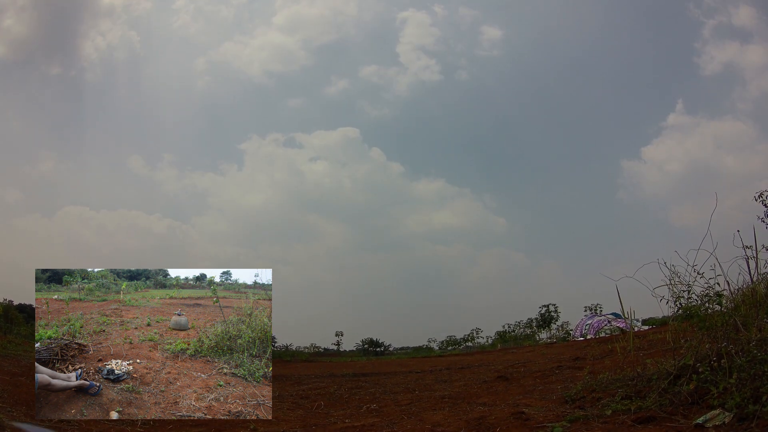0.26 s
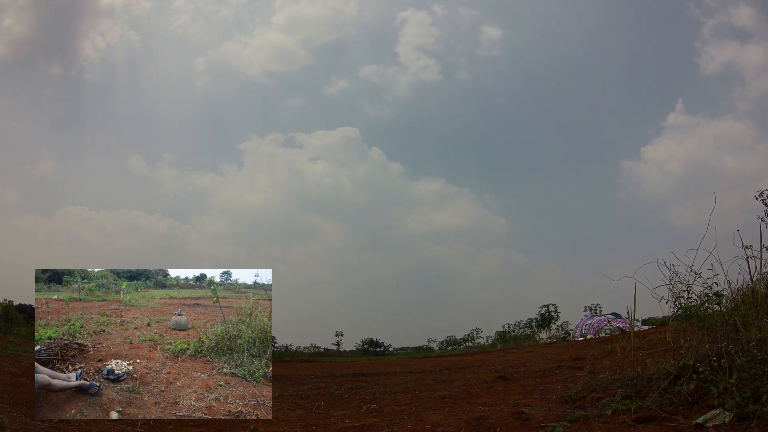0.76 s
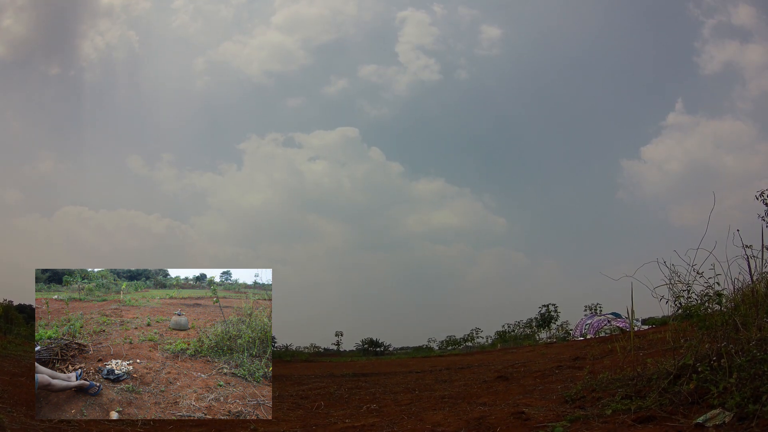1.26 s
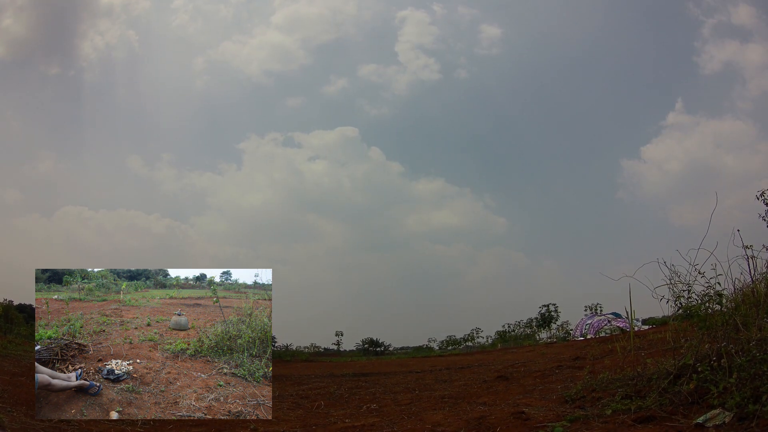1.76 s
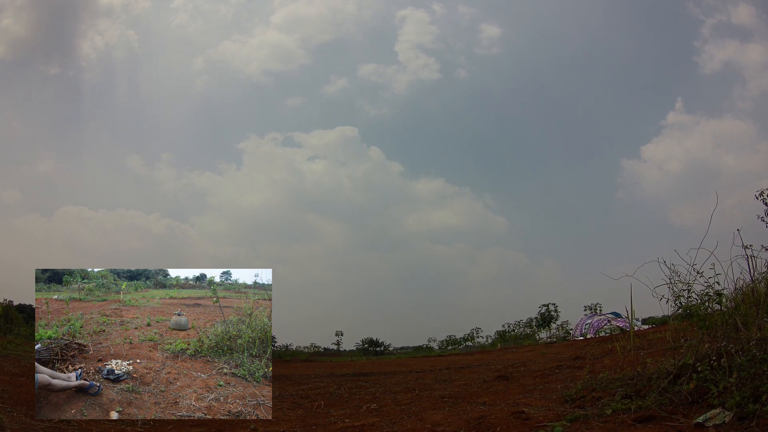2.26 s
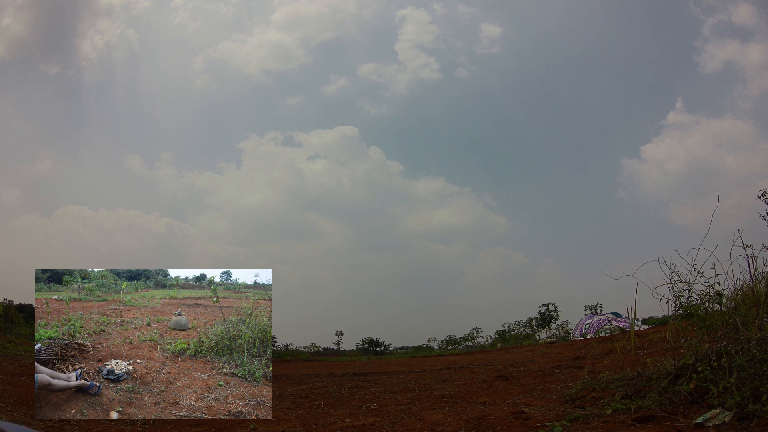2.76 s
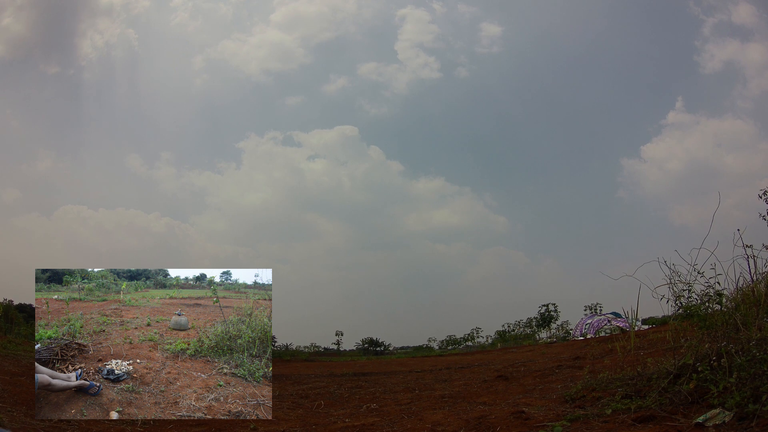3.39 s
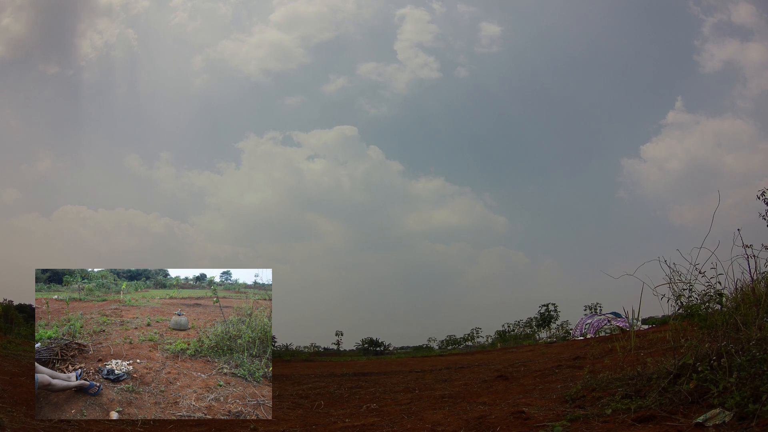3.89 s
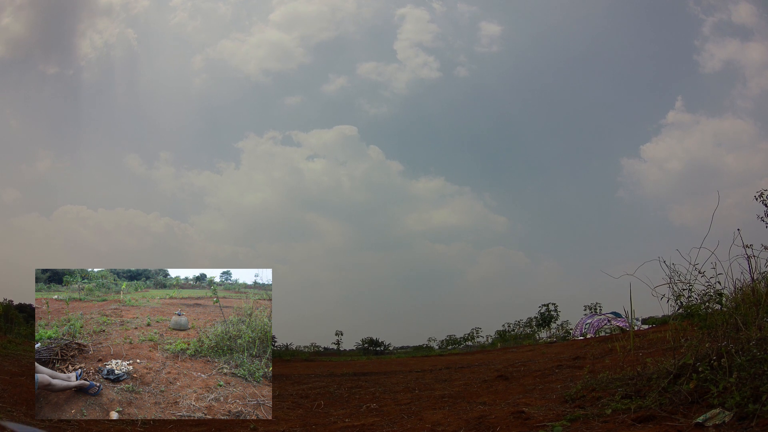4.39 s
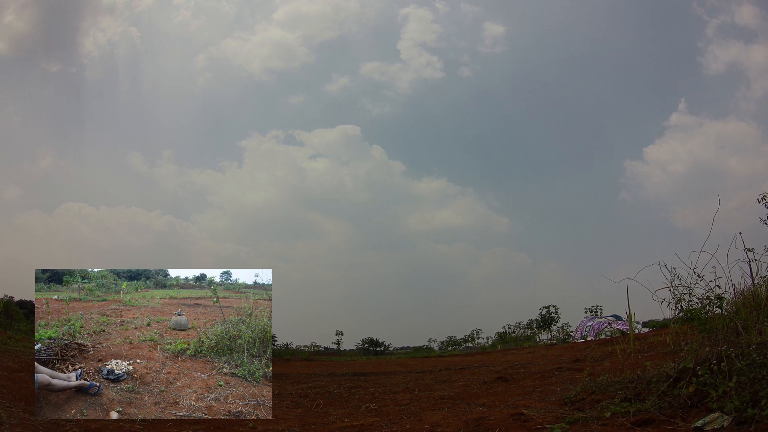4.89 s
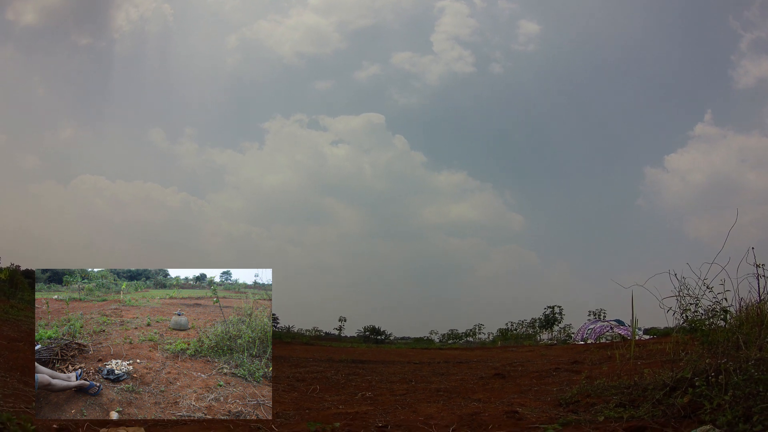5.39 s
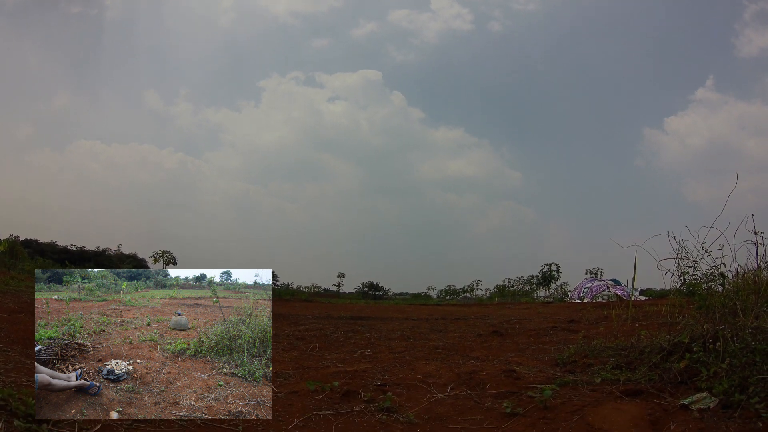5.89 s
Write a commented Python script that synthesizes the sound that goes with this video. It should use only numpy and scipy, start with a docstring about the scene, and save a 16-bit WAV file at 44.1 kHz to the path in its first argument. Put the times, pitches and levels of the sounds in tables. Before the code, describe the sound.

Heard from a small drone's own frame on bare open ground: four rotors idle with a dry mid-pitched rattle, bearing hiss and thin high squeal. Near the end the motors chirp and surge, the frame skids and rattles harder, air blasts off the soil, and the drone lifts into loud, beating blade tones that overload the close microphone.

```python
"""Four three-bladed rotors of a small drone, heard from its own frame: idle on bare ground, spool-up, lift-off.
Blade tones glide and beat as summed sinusoids of the integrated shaft angles; motors add high shaft orders.
Unbalance shakes the frame into a filtered-noise rattle with short tonal swells; in flight, loud beats of the
blade tones overload the microphone, which adds a third harmonic and grit.
Behind: blade-chopped noise for the downwash, low buffeting for the wind, microphone crackle and thin ticks."""
import sys
import numpy as np
from scipy import signal
from scipy.fft import rfft, irfft, next_fast_len
from scipy.io import wavfile
from scipy.ndimage import uniform_filter1d, minimum_filter1d, map_coordinates

SR = 44100
rng = np.random.default_rng(int(sys.argv[2]) if len(sys.argv) > 2 else 0)


def persist_wave(psi):
    """Save psi, clipped to +-1, as 16-bit WAV."""
    counts = np.round(np.clip(psi, -1, 1) * 32767).astype(np.int16)
    wavfile.write(sys.argv[1], SR, np.atleast_2d(counts).T)


N = 271185
TIME = np.arange(N) / SR  # s
BLADES = 3  # per rotor
RMS_TO_PEAK = np.sqrt(2)  # of a sine
THROTTLE_S, THROTTLE_RISE_S = 4.83, 0.032
LIFT_S, LIFT_HZ = 5.41, 425  # lift-off time, reference blade passing rate
CLIMB_M_PER_S = 1.0


def amp(db):
    """Decibels to gain."""
    return 10 ** (np.asarray(db) / 20)


def unit(x):
    """Scales to an rms of 1."""
    return x / np.sqrt(np.mean(x ** 2) + 1e-20)


def gain_at(spectrum, hz):
    """Spectrum gain at the given frequencies, interpolated over log frequency."""
    f_hz, db = np.transpose(spectrum)
    return amp(np.interp(np.log(hz + 1), np.log(f_hz + 1), db))


def coloured(x, spectrum):
    """Filters x by a spectrum, rms 1."""
    size = next_fast_len(N + SR // 4)  # padded against wrap-around
    f_hz = np.fft.rfftfreq(size, 1 / SR)
    filtered = irfft(rfft(x, size) * gain_at(spectrum, f_hz), size)
    return unit(filtered[:N])


def wander(rate_hz):
    """Smooth random signal, rms 1, changing about rate_hz times a second."""
    coarse_s = TIME[::64]
    points = rng.standard_normal(4096)
    smooth = map_coordinates(points, [coarse_s * 2 * rate_hz], order=2, mode="wrap")
    return unit(np.interp(TIME, coarse_s, smooth))


def curve(rows):
    """Joins (t/s, value) points by straight lines."""
    return np.interp(TIME, *np.transpose(rows))


def swell(s, length_s):
    """Gaussian rise and fall around s; length_s is its full width 5 dB down."""
    return np.exp(-np.log(10) * np.minimum(((TIME - s) / length_s) ** 2, 20))


def near(hz, critical_hz, width_hz):
    """Resonance response to a driving rate: 1 at the centre."""
    return 1 / np.hypot(1, (hz - critical_hz) / width_hz)


def throttle():
    """0 at idle, 1 once the throttle is open."""
    return np.clip((TIME - THROTTLE_S) / THROTTLE_RISE_S, 0, 1)


def height_m():
    """Height above the ground: a steady climb from lift-off."""
    return CLIMB_M_PER_S * np.maximum(TIME - LIFT_S, 0)


# set speed per rotor through idle and climb: (t/s, blade passing f/Hz)
SPEED_A = [(0, 203), (.08, 205), (.17, 203.2), (.37, 208), (.45, 204.1), (.63, 205.1), (.93, 205.2),
           (1.22, 210.8), (1.4, 207.4), (1.68, 210.5), (1.78, 206.7), (1.95, 211.5), (2.02, 210.1),
           (2.38, 210.3), (2.51, 209.8), (2.75, 210.3), (3.5, 210.7), (4.37, 212), (4.45, 207.3),
           (4.54, 212), (4.67, 212.6), (4.835, 213.2), (4.865, 273.7), (4.9, 334), (4.96, 381.2),
           (5.025, 373.3), (5.06, 344.7), (5.105, 334), (5.15, 359.3), (5.27, 400.1), (5.38, 502),
           (5.46, 554), (5.54, 570.3), (5.62, 614.4), (5.68, 614), (5.75, 569.7), (5.86, 571.8),
           (5.98, 684), (6.15, 690)]
SPEED_B = [(0, 158.7), (1.651, 156.5), (2.9, 151.8), (4.842, 152), (4.875, 179.7), (4.905, 198.7),
           (4.95, 236.8), (5.0, 237.3), (5.06, 193.2), (5.106, 181.9), (5.2, 256.6), (5.44, 425.2),
           (5.549, 480), (5.7, 484.7), (5.74, 494.6), (5.855, 496.7), (5.885, 529.3), (5.98, 527.6),
           (6.02, 549.8), (6.08, 549.4), (6.15, 572.7)]
SPEED_C = [(0, 108.2), (4.985, 108.9), (5.035, 142.7), (5.15, 150), (5.28, 290.7), (5.38, 366.2),
           (5.45, 402.4), (5.56, 425.3), (5.621, 459.8), (5.69, 443.6), (5.759, 457.4), (5.961, 463),
           (6.01, 494.2), (6.15, 534)]
SPEED_D = [(0, 99.5), (5.05, 99.23), (5.1, 117.8), (5.2, 160.4), (5.3, 199.9), (5.37, 345.3), (5.52, 414.2),
           (5.67, 436.3), (5.74, 470.8), (5.86, 481.6), (6.15, 627)]


def speed(rows, hunt=0.00295, hunt_hz=6):
    """Blade passing rate in Hz; the controller hunts around the set speed."""
    return curve(rows) * (1 + hunt * wander(hunt_hz))


# blade tone against speed: (blade passing f/Hz, level/dB)
BLADE_TONE = [(100, -62.5), (155, -43), (210, -38), (300, -25.5), (370, -23), (430, -19), (520, -15.5),
              (700, -16.5)]
# relative tone level per rotor, as the frame tilts: (t/s, level/dB)
REACH_A = [(4.8, -7), (5.2, -12), (5.36, -8), (5.47, -1.5), (5.62, -7), (5.75, -6.5), (5.9, -2.5),
           (6.0, -2.5), (6.15, -2)]
REACH_B = [(4.8, 0), (5.0, -1), (5.25, -0.5), (5.42, -3.5), (5.55, 0.5), (5.7, -6), (5.74, 1.5),
           (5.87, 5.5), (6.05, 0), (6.11, -8)]
REACH_C = [(4.8, 2.5), (5.25, -0.5), (5.38, 3), (5.47, 3), (5.65, 4.5), (5.7, 2.5), (5.8, -4.5), (5.95, 1),
           (6.05, 1), (6.13, 2)]
REACH_D = [(4.8, -4), (5.35, 5), (5.5, -2.5), (5.7, -5), (5.9, -8.5), (6.1, -0.5)]


def spin(blade_hz, near_db, idle_jitter=0.0018, air_jitter=0.006, flutter_db=1.0):
    """Shaft angle, shaft rate and tone level; a fast rotor is unsettled by its own turbulence."""
    load = np.clip((blade_hz - 200) / 160, 0, 1)
    jitter = (idle_jitter + air_jitter * load) * wander(35)
    shaft_hz = blade_hz / BLADES * (1 + jitter)
    angle = 2 * np.pi * (np.cumsum(shaft_hz) / SR + rng.random())
    tone_db = near_db + 20 * np.log10(gain_at(BLADE_TONE, blade_hz))
    return angle, shaft_hz, tone_db + flutter_db * load * wander(22)


# loud beats of the blade tones in flight: (t/s, length/s, relative level/dB)
LOUD_BEATS = [(5.425, 0.0046, -13), (5.451, 0.0036, -13), (5.467, 0.018, -19), (5.482, 0.0033, -14),
              (5.497, 0.0054, -19), (5.516, 0.0039, -12), (5.527, 0.0047, -10), (5.544, 0.0058, -15),
              (5.558, 0.006, -23), (5.582, 0.0071, -13.5), (5.588, 0.012, -27), (5.623, 0.0061, -19),
              (5.638, 0.0031, -21), (5.651, 0.005, -16.5), (5.737, 0.0092, -11.5), (5.759, 0.0084, -12),
              (5.786, 0.0067, -14), (5.816, 0.0047, -12.5), (5.83, 0.0062, -15), (5.84, 0.0073, -17),
              (5.853, 0.0052, -10.5), (5.882, 0.013, -14.5), (5.9, 0.007, -14), (5.912, 0.005, -17),
              (5.925, 0.0055, -13), (5.946, 0.0059, -14), (5.958, 0.01, -14.5), (5.977, 0.006, -13.5),
              (5.993, 0.005, -14.5), (6.008, 0.0097, -13), (6.031, 0.006, -17), (6.054, 0.0094, -16),
              (6.077, 0.003, -17.5), (6.112, 0.004, -21), (6.132, 0.004, -26), (6.146, 0.005, -12)]


def loud_beats():
    """Envelope of the loud beats: a Gaussian swell each."""
    return sum(amp(db) * swell(s, length_s) for s, length_s, db in LOUD_BEATS)


def beating_tones(rotors, beats, between_db=-1.5, push=7, limit_db=-2.0):
    """The four blade tones summed, raised on loud beats, soft-limited (complex: size and phase)."""
    tones = RMS_TO_PEAK * sum(amp(db) * np.exp(1j * BLADES * angle) for angle, _, db in rotors)
    driven = tones * amp(between_db * throttle()) * (1 + push * beats)
    return driven / np.sqrt(np.hypot(1, abs(driven / amp(limit_db)) ** 2))


# overtones of a passing blade: (multiple of blade rate, relative level/dB)
OVERTONES = [(2, -13.5), (3, -16.5), (4, -19.5), (5, -28), (6, -28.5), (7, -32)]
# frame response to the overtones: (f/Hz, gain/dB)
FRAME = [(200, 7), (450, 13), (650, 3), (780, 12), (920, 9), (1050, -1.5), (1250, -6), (1420, -12),
         (1550, -8), (1750, -13), (2050, -5), (2400, -3.5), (3200, 6), (4500, 6.5)]


def propeller(angle, shaft_hz, level_db, overtone_db=-0.6, rough=0.42, smear_rad=.22,
              unloaded_db=-4.0, loaded_hz=400, loading_span_hz=60, uneven_db=-22):
    """Overtones grow as blades bite, shaken by eddies; unequal blades add shaft orders between them."""
    blade_hz = BLADES * shaft_hz
    bent = BLADES * angle + smear_rad * wander(70)
    bite = amp(unloaded_db * np.clip((loaded_hz - blade_hz) / loading_span_hz, 0, 1))
    overtones = sum(amp(db) * gain_at(FRAME, k * blade_hz) * np.cos(round(k) * bent)
                    for k, db in OVERTONES)
    orders = np.cos(bent + angle) + np.cos(2 * bent - angle) + np.cos(2 * bent + angle)
    between = amp(uneven_db) * throttle() * orders
    level = RMS_TO_PEAK * amp(level_db + overtone_db) * bite * (1 + rough * wander(60))
    return level * (overtones + between)


# magnetic whine, 12-slot 14-pole motor: (multiple of shaft rate, relative level/dB)
WHINE = [(42, -8.5), (56, -7), (70, -7), (82, -5), (84, 1.5), (85, -6), (98, -9), (126, -14.5)]
# arm response to the whine: (f/Hz, gain/dB)
ARMS = [(1500, -5.5), (2200, -8), (2800, -4), (3200, -3), (3700, -5), (4250, -11.5), (4650, -23.5),
        (5100, -5.5), (5900, -5), (6300, -4), (6700, 3), (6920, 9), (7200, -35), (9000, -52),
        (15000, -67.5)]


def motor(angle, shaft_hz, whine_db=-54, load_db=-15, grit=0.4, smear_rad=.22, patchy_db=1.6):
    """Wavering high shaft orders pass the arm resonances and fade as the throttle opens."""
    whine = 0
    for k, db in WHINE:
        unsteady = (1 + grit * wander(40)) * amp(patchy_db * wander(8))
        tone = np.cos(round(k) * angle + smear_rad * wander(70))
        whine = whine + amp(db) * unsteady * gain_at(ARMS, k * shaft_hz) * tone
    return RMS_TO_PEAK * amp(whine_db + load_db * np.sqrt(throttle())) * whine


# current surges: (t/s, length/s, rotor letter, multiple of shaft rate, level/dB)
SURGES = [(4.865, 0.02, "A", 42, -45), (4.885, .04, "B", 84, -52), (4.899, 0.018, "A", 42, -51),
          (4.91, .02, "A", 56, -45), (4.99, 0.037, "A", 42, -56), (5.022, 0.027, "C", 84, -43),
          (5.055, .03, "A", 56, -44), (5.101, .06, "B", 84, -56), (5.103, 0.047, "D", 84, -38.5),
          (5.139, .02, "A", 56, -45), (5.222, .015, "C", 84, -40.5)]


def chirps(angles, smear_rad=.6, grit=.4):
    """Current surges at speed changes make torque ripple sing in chirps that glide with the shaft."""
    shaft = dict(zip("ABCD", angles))
    blur = smear_rad * wander(150)
    ripple = sum(amp(db) * swell(s, length_s) * np.cos(round(k) * shaft[rotor] + blur)
                 for s, length_s, rotor, k, db in SURGES)
    return RMS_TO_PEAK * (1 + grit * wander(120)) * ripple


# idle squeal of motor A: (multiple of shaft rate, relative level/dB)
SQUEAL = [(92, -16.5), (94, 5), (95, 3.5), (97, -5), (98, -7)]


def squeal(angle, blade_hz, squeal_db=-47, critical_hz=210, width_hz=1.5, waver_db=2.3):
    """Close shaft orders beat into a thin squeal, strongest near one critical idle speed."""
    lines = sum(amp(db) * np.cos(round(k) * angle) for k, db in SQUEAL)
    resonance = near(blade_hz, critical_hz, width_hz)
    return amp(squeal_db) * resonance * (1 - throttle()) * unit(lines * amp(waver_db * wander(35)))


def once_a_turn(angles, width_turns):
    """Each unbalanced shaft gives a decaying push on every turn."""
    return sum(np.exp(-(a / (2 * np.pi) % 1) / width_turns) for a in angles)


# bearing hiss spectrum: (f/Hz, relative level/dB)
BEARINGS = [(1500, -43.5), (2230, -46.5), (2500, 0.5), (2700, -15), (3200, 4), (3600, -9), (4000, -16.5),
            (4350, -26), (4570, -48.5), (4950, -22), (5400, -33), (6200, -16), (6850, -11.5), (7200, -51),
            (8200, -38), (10000, -60.5), (15000, -77)]


def bearings(angles, hiss_db=-45.0, ring_hz=3207, ring_db=-47.5, ring_spread=0.084):
    """Bearings hiss in step with the shafts and keep one narrow resonance singing."""
    pulse = .5 + once_a_turn(angles, width_turns=1.0)
    hiss = coloured(pulse * rng.standard_normal(N), BEARINGS)
    sway = 1 + ring_spread * (wander(35) + 1j * wander(35))
    ring = unit((sway * np.exp(2j * np.pi * ring_hz * TIME)).real)
    return amp(hiss_db) * hiss + amp(ring_db) * ring


# frame rattle spectrum: (f/Hz, relative level/dB)
RATTLE = [(150, -34), (240, -36.5), (300, -20), (400, -6.5), (480, 1), (590, -0.5), (720, -3), (900, -12),
          (1050, -20), (1250, -29.5), (1500, -27), (1900, -37), (2300, -41), (4000, -83)]


def rattle(angles, effort_oct, chatter=3.2, regular=0.34, idle_db=-24.0, flight_db=-21, play=2.0,
           skid_db=4.0, skid_s=5.27, skid_length_s=0.19):
    """Unbalance shakes the frame within its play: pushes and loose chatter, boosted as the feet skid."""
    looseness = chatter + once_a_turn(angles, width_turns=0.65)
    loose = coloured(looseness * rng.standard_normal(N), RATTLE)
    pushes = coloured(np.diff(once_a_turn(angles, width_turns=0.37), prepend=0), RATTLE)
    shake = unit(loose + regular * pushes)
    power = uniform_filter1d(uniform_filter1d(shake ** 2, size=180), size=120)
    limited = unit(shake / np.sqrt(np.hypot(1, power / play ** 2)))
    driven = np.clip(1 + effort_oct / 1.94, 0, 1)
    level_db = (1 - driven) * idle_db + driven * flight_db + skid_db * swell(skid_s, skid_length_s)
    return amp(level_db) * limited


# louder moments of the rattle: (t/s, length/s, f/Hz, relative level/dB)
RATTLE_PEAKS = [(0.066, 0.0031, 614, -14), (0.17, 0.015, 572, -12.5), (0.201, 0.0066, 578, -11),
                (0.281, 0.004, 575, -7.5), (0.351, 0.018, 590, -12), (0.377, 0.0032, 550, -9),
                (0.401, 0.0026, 530, -10), (0.436, 0.0051, 534, -11.5), (0.481, 0.0065, 580, -10.5),
                (0.793, 0.011, 560, -13.0), (0.871, 0.0043, 549, -13.5), (1.101, 0.0042, 536, -8.5),
                (1.231, 0.0061, 594, -13.0), (1.253, 0.0074, 577, -9), (1.404, 0.0042, 588, -10.5),
                (1.652, 0.0074, 580, -12.5), (1.743, 0.0058, 620, -13.0), (2.148, 0.016, 577, -11),
                (2.348, 0.0053, 548, -8), (3.064, 0.0048, 570, -9.5), (3.093, 0.0073, 573.4, -10),
                (3.935, 0.0061, 579, -11.5), (4.044, 0.0035, 605, -12), (4.725, 0.0047, 517.5, -12.5),
                (5.014, 0.01, 551, -12), (5.07, 0.0077, 520, -13)]


def with_rattle_peaks(chatter, peak_db=-2.0, dip=0.34):
    """Louder moments of the rattle: short tonal swells, with the noise dipped under them."""
    tones, held = 0, 0
    for s, length_s, hz, db in RATTLE_PEAKS:
        shape = swell(s, length_s)
        tone = np.cos(2 * np.pi * (hz * (TIME - s) + rng.random()))
        tones = tones + amp(db + peak_db) * shape * tone
        held = held + shape
    return tones + chatter * np.clip(1 - dip * held, 0, 1)


# overload spectrum: (f/Hz, relative level/dB)
OVERLOAD = [(700, -45), (1200, -11.5), (1500, -1), (1750, 2), (2300, -8), (3200, -22), (4500, -8),
            (6500, -38), (8000, -56), (15000, -87)]


def overload(tones, beats, overload_db=-2.5, grit=0.72, grain=1.5):
    """On loud beats the overloaded microphone adds a third harmonic, and grit once a blade-tone cycle."""
    phase = np.angle(tones)
    gritty = grit * np.exp(grain * (np.cos(phase) - 1)) * rng.standard_normal(N)
    rasp = coloured(throttle() * (np.cos(3 * phase) + 2 * gritty), OVERLOAD)
    return amp(overload_db) * beats * rasp / np.std(rasp[TIME > LIFT_S])


# low roar and high swish spectra: (f/Hz, relative level/dB)
WASH = [(100, -17.5), (250, -15), (400, -1), (600, 7), (800, -7), (1200, -4.5), (1600, -10), (2300, -14),
        (3200, -24.5), (4200, -22), (7000, -62), (15000, -92)]
SWISH = [(1500, -32.5), (2600, -1), (3200, 8), (3800, -4), (4300, -14.5), (5000, -7), (5500, -8),
         (6200, -4.5), (6700, -16), (7300, -26), (8500, -32.5), (10000, -45), (15000, -65.5)]


def downwash(angles, effort_oct, wash_db=-19, wash_db_per_octave=30, wash_fade_db_per_m=21,
             swish_db=-31.0, swish_db_per_octave=7.5, chop=0.19, eddy_db=2.5, ragged_db=0.97):
    """Blade-chopped turbulence grows with speed; its roar thins as the ground falls away."""
    chopped = 1 + chop * sum(np.cos(BLADES * a) for a in angles)
    roar_db = wash_db + wash_db_per_octave * effort_oct - wash_fade_db_per_m * height_m()
    wash = amp(roar_db + eddy_db * wander(45))
    swish = amp(swish_db + swish_db_per_octave * effort_oct + ragged_db * wander(90))
    low = wash * coloured(chopped * rng.standard_normal(N), WASH)
    high = swish * coloured(chopped * rng.standard_normal(N), SWISH)
    return throttle() * (low + high)


# buffeting spectrum: (f/Hz, relative level/dB)
BUFFET = [(15, -24), (30, -8), (60, 0.5), (110, 5), (190, 5), (300, -2.5), (800, -67)]
# breeze before gusts: (t/s, level/dB)
BREEZE = [(0, -60.5), (1.7, -45.5), (2.5, -56), (3.25, -59), (3.8, -48), (4.8, -53.5)]
# air puffs thrown back by the ground: (t/s, level/dB)
PUFFS = [(5.055, -36), (5.211, -30), (5.305, -25.5), (5.385, -23.5), (5.52, -22.5)]


def wind(effort_oct, gust_db=3, gust_hz=7, blast_db=-31, blast_db_per_octave=19,
         blast_fade_db_per_m=44, puff_s=0.021):
    """Low microphone buffeting: gusty breeze, plus blast and puffs off the ground; blast fades with height."""
    breeze = amp(curve(BREEZE) + gust_db * wander(gust_hz))
    thrown_db = blast_db + blast_db_per_octave * effort_oct - blast_fade_db_per_m * height_m()
    blast = throttle() * amp(thrown_db)
    puffs = sum(amp(db) * np.exp(-((TIME - s) / puff_s) ** 2) for s, db in PUFFS)
    strength = np.sqrt(breeze ** 2 + blast ** 2 + puffs ** 2)
    return strength * coloured(rng.standard_normal(N), BUFFET)


def clicks(rows, click_db, decay_s=0.00005):
    """Very short, bright clicks: impulses with an exponential decay."""
    spikes = np.zeros(N)
    for s, db in rows:
        spikes[round(s * SR)] = amp(db + click_db)
    return signal.lfilter([1], [1, -np.exp(-1 / (decay_s * SR))], spikes)


# microphone crackles: (t/s, relative level/dB)
CRACKLES = [(5.5144, -43), (5.6231, -41), (5.7543, -43), (5.7644, -39), (5.7684, -40), (5.7848, -53),
            (5.8142, -39), (5.882, -43), (5.914, -42.5), (5.9743, -49), (6.0107, -40), (6.0317, -49)]


def crackle(spray_db=-5, spray_s=0.022, per_s=700):
    """Each microphone crackle is a click in a short spray of random smaller ones."""
    size = sum(amp(db + spray_db) * swell(s, spray_s) for s, db in CRACKLES)
    spray = size * (rng.random(N) < per_s / SR) * rng.standard_normal(N)
    return clicks(CRACKLES, click_db=16.5) + np.diff(spray, prepend=0)


# thin ticks, whole seconds apart: (t/s, relative level/dB)
TICKS = [(1.244, -49), (2.245, -49), (4.2442, -63), (5.2445, -58)]


def ticks():
    """Faint ticks, probably from the camera's electronics: one short click each."""
    return clicks(TICKS, click_db=10)


def scene():
    """Sums all sources; the four rotor speeds drive the tones, rattle and downwash."""
    speeds = [speed(rows) for rows in (SPEED_A, SPEED_B, SPEED_C, SPEED_D)]
    reaches = (REACH_A, REACH_B, REACH_C, REACH_D)
    effort_oct = np.log2(np.mean(speeds, axis=0) / LIFT_HZ)  # re lift-off speed
    rotors = [spin(hz, curve(reach)) for hz, reach in zip(speeds, reaches)]
    angles = [angle for angle, _, _ in rotors]
    beats = loud_beats()
    tones = beating_tones(rotors, beats)
    blades = tones.real + sum(propeller(*rotor) for rotor in rotors)
    motors = sum(motor(angle, hz) for angle, hz, _ in rotors) + chirps(angles)
    motors = motors + squeal(angles[0], curve(SPEED_A)) + bearings(angles)
    frame = with_rattle_peaks(rattle(angles, effort_oct))
    air = downwash(angles, effort_oct) + wind(effort_oct)
    microphone = overload(tones, beats) + crackle()
    return (blades + motors + frame + air + microphone + ticks())[None]


def record(dry, ceiling=.95, fade_in_s=.004, edge_hz=15800):
    """Short fade-in, fast look-ahead limiter, then a linear-phase low-pass."""
    dry = dry * np.sin(np.pi / 2 * np.minimum(TIME / fade_in_s, 1)) ** 2
    room = minimum_filter1d(np.minimum(1, ceiling / (abs(dry) + 1e-9)), size=161)
    held = dry * uniform_filter1d(uniform_filter1d(room, size=101), size=61)
    lowpass = signal.firwin(511, edge_hz, window=("kaiser", 9), fs=SR)
    return signal.oaconvolve(held, lowpass[None], "same")


dry = scene()
out = record(dry)
persist_wave(out)
```